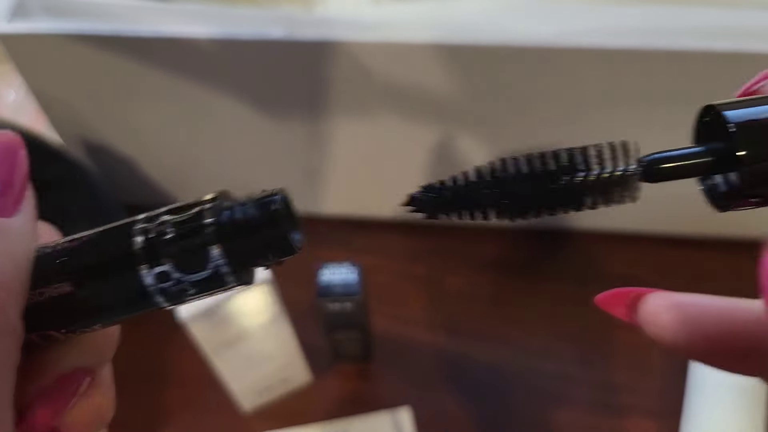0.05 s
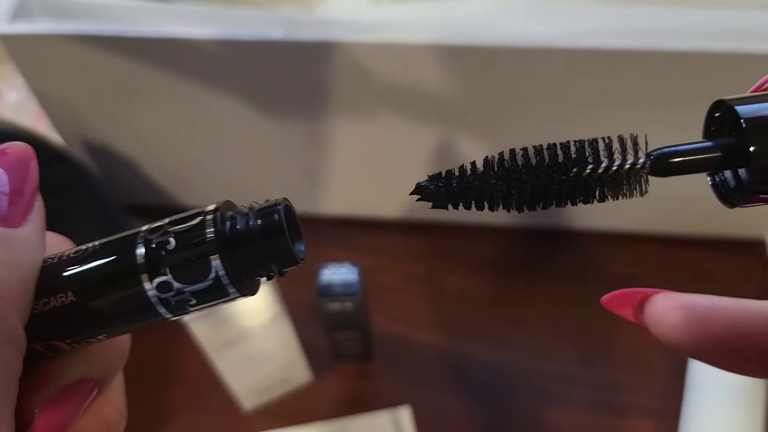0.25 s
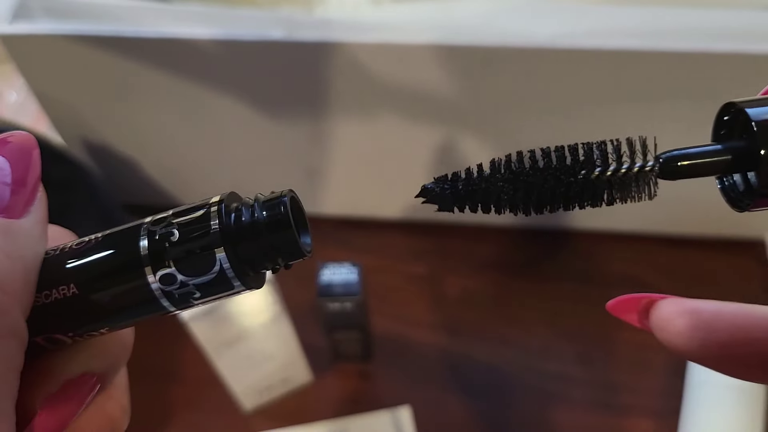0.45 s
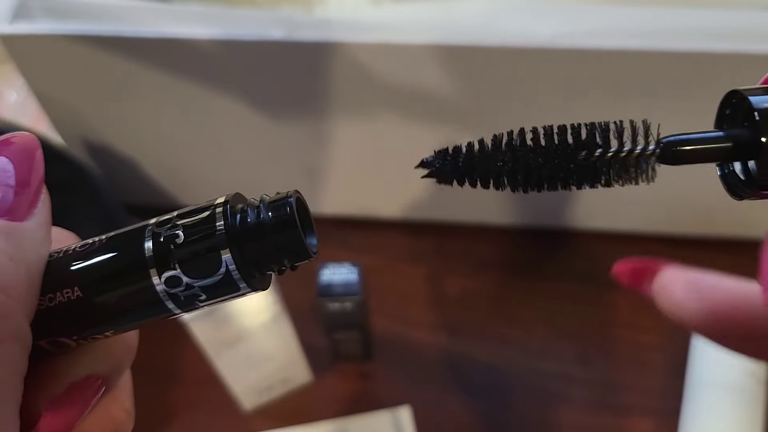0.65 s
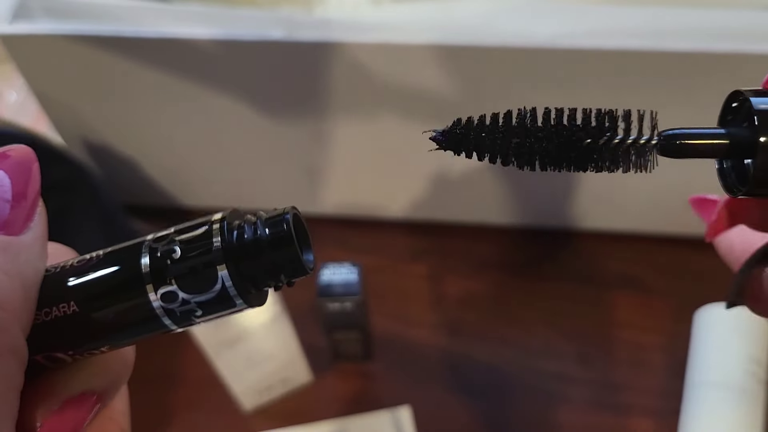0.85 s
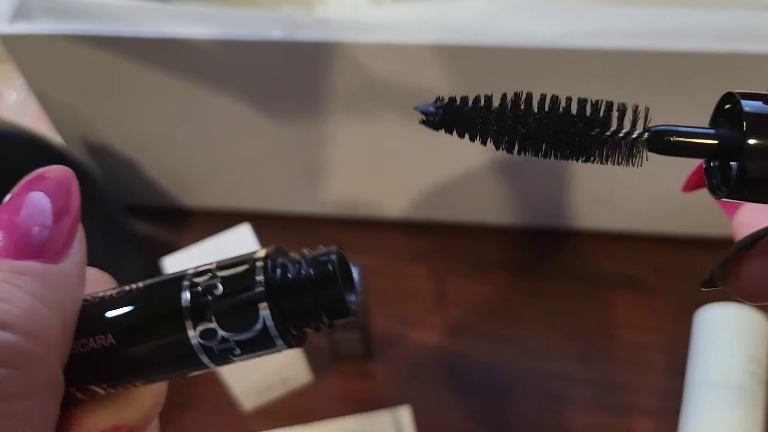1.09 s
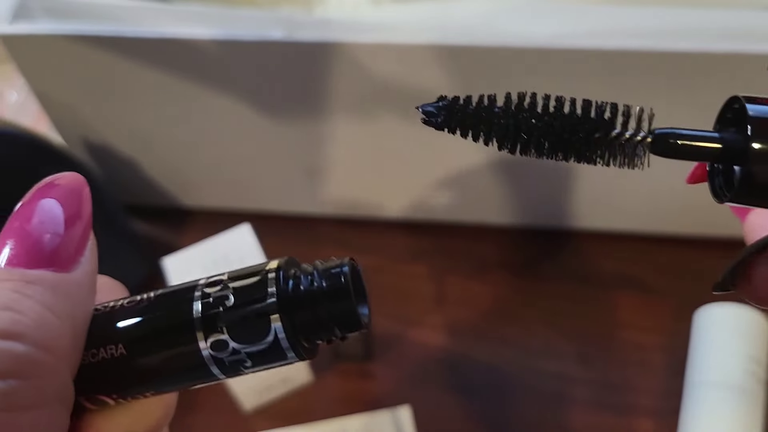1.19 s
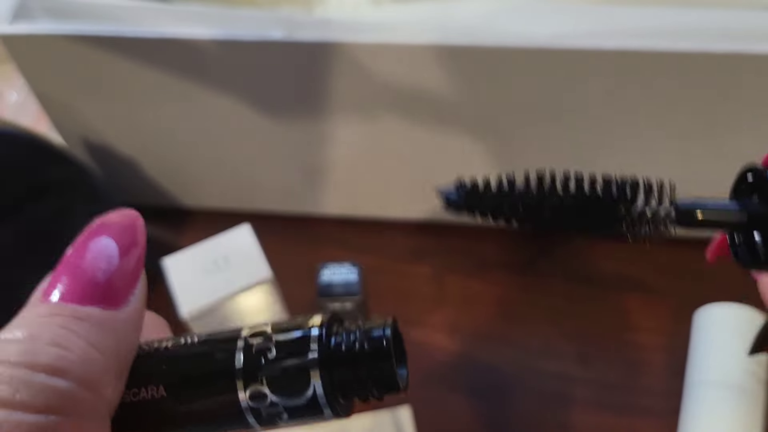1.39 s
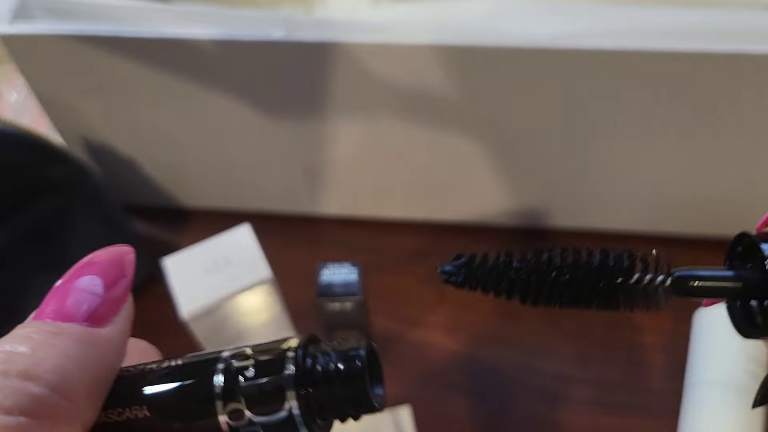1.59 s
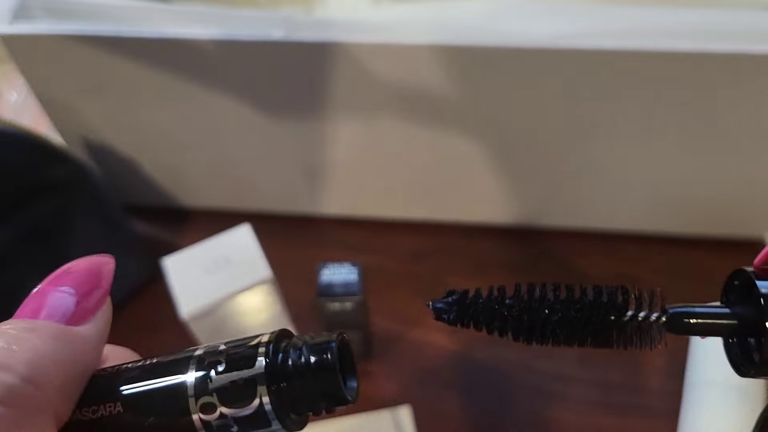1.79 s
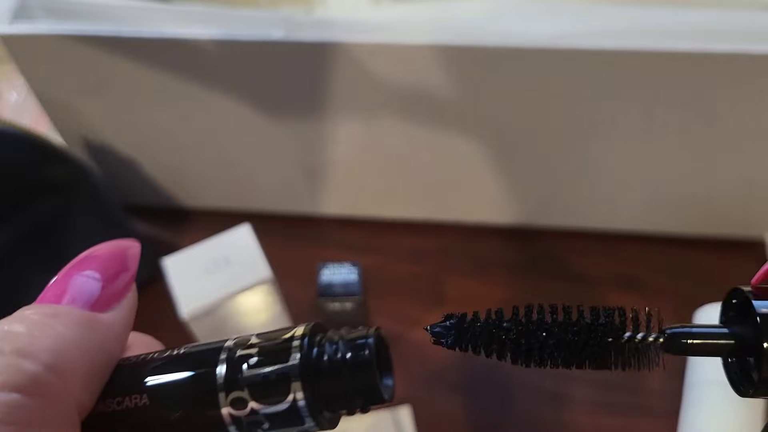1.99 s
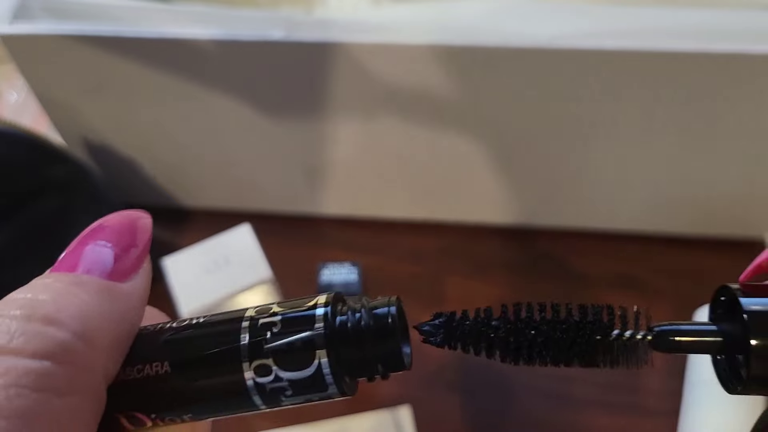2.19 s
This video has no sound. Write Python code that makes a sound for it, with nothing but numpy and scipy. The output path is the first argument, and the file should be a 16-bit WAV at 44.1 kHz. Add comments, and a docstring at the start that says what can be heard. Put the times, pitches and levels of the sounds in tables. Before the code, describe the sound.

A sharp, bright pop as a bristled wand pulls free of a small plastic tube, after a faint rising hiss; then a short room echo, low hum, and much later a tiny nail tap, heard close in stereo.

```python
"""Mains hum, rumble and a fluttering hiss, swelling as a bristled wand is drawn from a small plastic tube.
The wand comes free with a sharp pop, answered by a quiet room; the right microphone ticks faintly, a nail taps.
Hum is wavering sines; rumble, microphone hiss and the air past the wiper are coloured noise.
Pop and tap are decaying modes, the pop with a noise crackle; the room is a noise tail decaying band by band."""
import sys
import numpy as np
from scipy import signal
from scipy.fft import rfft, irfft
from scipy.io import wavfile
from scipy.ndimage import uniform_filter1d

SR = 44100
rng = np.random.default_rng(int(sys.argv[2]) if len(sys.argv) > 2 else 0)


def boost_factor(decibels):
    """Convert a level in decibels to a linear amplitude factor."""
    exponent = np.asarray(decibels, float) / 20
    return 10 ** exponent


def wav_record(signal):
    """Record a signal, one row per channel, as 16-bit PCM in the file named by sys.argv[1]."""
    frames = np.transpose(np.atleast_2d(signal))
    bounded = np.clip(frames, -1, 1)
    # unit amplitude maps onto the largest positive 16-bit level
    quanta = np.round(bounded * 32767).astype(np.int16)
    wavfile.write(sys.argv[1], SR, quanta)


N = 99225
T = np.arange(N) / SR

# Background colour at each microphone. Each row: frequency in Hz, relative level in dB.
LEFT_COLOUR = [(20, -82), (30, -64), (90, -70), (200, -72), (400, -87.5), (650, -87.5), (880, -80),
               (1050, -92), (1600, -94.5), (1900, -104), (2400, -102), (2900, -112), (3600, -108),
               (4500, -110), (5000, -119), (6500, -122), (7000, -117), (7400, -110), (7900, -122),
               (9000, -124), (12000, -119), (15700, -119), (15850, -135)]
RIGHT_COLOUR = [(20, -86), (30, -75), (90, -69), (200, -72), (400, -86), (880, -86.5), (1400, -88.5),
                (2000, -100), (2300, -95), (2800, -106), (3500, -88), (4200, -92.5), (4900, -89.5),
                (5500, -101), (8300, -103), (9500, -120), (11500, -119), (12000, -114), (12500, -118),
                (14000, -117), (15700, -112), (15850, -135)]
# Likeness of the two backgrounds. Each row: frequency in Hz, correlation of left and right.
CORRELATION = [(60, 0.94), (130, 0.88), (290, 0.7), (640, 0.26), (1410, -0.22), (3100, 0.08), (6820, -0.03),
               (15000, -0.0)]
BACKGROUND_DB, RUMBLE_WALK_DB = -12, 2
# Mains hum lines. Each row: frequency in Hz, left and right level in dB rms, width of wander in Hz.
HUM_LINES = [(59.6, -59.5, -59, 3), (120, -62, -64.5, 3), (176, -70.5, -66, 8), (313, -86, -77, 8),
             (353, -78, -76.5, 8), (472.4, -80, -85, 2), (2597, -92, -102, 2), (11980, -104, -103, 40)]

# Colour of air past the wiper. Each row: frequency in Hz, relative level in dB.
AIR_COLOUR = [(880, -44), (1500, -24), (1900, -22), (2270, -4), (2490, -12), (3180, -10), (4000, -14),
              (5070, -5.5), (7030, 1.5), (8320, -12.5), (9470, -20.5), (12900, -14), (16000, -16.5)]
# Balance of the air. Each row: frequency in Hz, left minus right in dB.
AIR_BALANCE = [(1500, -33), (2400, 4), (4400, -9), (6500, -10), (9000, -1), (15000, -11.5)]
# Course of the air. Each row: time in seconds, level in dB.
AIR_LEVEL = [(0, -65), (.03, -62.5), (.13, -60), (.16, -59.5), (.2, -57.5), (.225, -53.5), (.234, -52),
             (.2372, -35), (.24, -95)]
# Brightening of the air. Each row: time in seconds, gain of the treble over the rest in dB.
AIR_TREBLE_GAIN = [(0, -1.5), (.1, -0.5), (.17, 2), (.2, 5.5), (.235, 1.5)]
TREBLE_HZ, FLUTTER_DB = 9037, 1.5

# Modes of tube and wand. Each row: frequency in Hz, relative left and right level in dB, t60 in seconds.
TUBE_MODES = [(690, -26.5, -32.5, .02), (920, -26, -17, .019), (1242, -23, -18.5, .012),
              (1600, -28, -16, .012), (2360, -42, -18, .015), (3400, -13, -11, .015), (4400, -13, -7, .015),
              (5250, -8, -6, 0.01413), (2968, -24.5, -23.5, 0.01506), (5762, -15.5, -10.5, 0.01),
              (6600, -12, -9, .012), (6950, -13.5, -11, 0.013), (7300, -6.5, -8, .016),
              (10100, -22.5, -19.5, .01), (11510, -21.5, -18, .011), (11800, -24, -17.5, .011),
              (14000, -33.5, -14, .012), (15600, -29, -16, .012)]
# First snap of the seal. One row: frequency in Hz, relative left and right level in dB, t60 in seconds.
SNAP_MODE = (5600, -6, 5, .0035)
# Thump of air in the tube. Each row: frequency in Hz, relative left and right level in dB, t60 in seconds.
THUMP_MODES = [(160.2, -15, -12.5, .035), (196.5, -29.5, -28, .14), (253.2, -22, -17.5, 0.038),
               (330, -18.5, -15.5, 0.028)]
# Crackle of the seal letting go. Each row: frequency in Hz, relative level in dB.
CRACK_COLOUR = [(300, -39.5), (1500, -11.5), (3000, -19), (4300, -4.5), (5500, -2), (7500, 0.5),
                (9000, -22), (12000, -16), (16000, -17)]
POP_S, POP_DB, LEFT_LAG_S, PUSH_S = .2374, -7.5, .00017, .00015
THUMP_LAG_S, THUMP_PUSH_S, MIC_LOW_HZ = .0012, .0011, 73
CRACK_DB, CRACK_T60_S, CRACK_PAN_DB = -13, .014, -3

# Room decay. Each row: frequency in Hz, t60 in seconds.
ROOM_DECAY = [(150, 0.06), (1000, 0.63), (2200, 0.17), (3500, 0.26), (5500, 0.3), (7500, 0.3),
              (11000, 0.34), (15000, 0.15)]
# Colour of the pop in the room. Each row: frequency in Hz, relative level in dB.
ROOM_COLOUR = [(80, -9), (200, 7), (400, -5.5), (700, -9.5), (1200, -15), (2000, -10.5), (3000, -2.5),
               (4500, -0.5), (6000, -3), (7400, 0), (8500, -16), (9600, -19), (11000, -14), (13000, -14),
               (15500, -15)]
ROOM_DB, SOFT_ROOM_DB, ROOM_RISE_S = -9.5, -14.5, .008
ECHO_S, ECHO_DB, ECHO_SPREAD_S = .0115, 8.5, .001794

# Bursts of hiss. Each row: start in seconds, relative level in dB.
TICK_TIMES = [(0.366, -62), (0.399, -62), (.4295, -66), (.461, -63), (0.495, -62), (0.528, -67),
              (.5587, -69), (.9673, -69.5), (1.3953, -66), (1.43, -65)]
# Colour of the bursts. Each row: frequency in Hz, relative level in dB.
TICK_COLOUR = [(2600, -31.5), (3300, 1), (5000, -1), (5600, -14), (7000, -40)]
TICK_S = .0099

# Modes of nail on plastic. Each row: frequency in Hz, relative level in dB, t60 in seconds.
NAIL_MODES = [(1935, -4, 0.02), (2265, 0.5, 0.019), (2530, -14, 0.012)]
TAP_S, TAP_DB, TAP_PAN_DB, TAP_PUSH_S = 1.5184, -49.5, -3, .0007

TOP_HZ, POP_TOP_HZ = 15750, 16600


def along(table, hz):
    """Read (Hz, value) rows on a log-frequency axis."""
    table = np.array(table, float)
    return np.interp(np.log(hz + 1), np.log(table[:, 0]), table[:, 1])


def over_time(table):
    """Read (s, value) rows at every sample."""
    return np.interp(T, *np.array(table).T)


def shaped(x, gain):
    """Filter by a gain given as a function of frequency."""
    return irfft(rfft(x) * gain(np.arange(N // 2 + 1) * SR / N), N)


def hiss(colour):
    """Noise of a colour, rms 1."""
    x = shaped(rng.standard_normal(N), lambda hz: boost_factor(along(colour, hz)))
    return x / x.std()


def walk(rate_hz):
    """Smoothed random wander, spread near 1."""
    hold = int(SR / rate_hz)
    steps = np.repeat(rng.standard_normal(N)[:N // hold + 1], hold)
    smooth = uniform_filter1d(uniform_filter1d(steps, hold), hold)
    return 1.3 * smooth[:N]


def ring(start_s, push_s, hz, db, t60_s):
    """One struck mode: a sine that decays exponentially after a push of finite rise."""
    age = np.maximum(T - start_s, 0)
    rise = 1 - np.exp(-age / push_s)
    return boost_factor(db - 60 * age / t60_s) * np.sin(2 * np.pi * hz * age) * rise


def pan(db):
    """Gains of left and right for a level difference."""
    return boost_factor(np.array([[db], [-db]]) / 2)


def below(x, top_hz):
    """Cut steeply above a frequency."""
    def gain(hz):
        return 1 / (1 + np.exp(np.clip((hz - top_hz) / 40, -50, 50)))
    return np.array([shaped(v, gain) for v in x])


def background():
    """Wandering rumble and microphone hiss; shared noise makes the bass alike left and right."""
    one, other = rng.standard_normal((2, N)) * np.sqrt(SR / 2)

    def like(hz):
        return np.clip(along(CORRELATION, hz), -1, 1)

    left = shaped(one, lambda hz: boost_factor(along(LEFT_COLOUR, hz)))
    shared = shaped(one, lambda hz: like(hz) * boost_factor(along(RIGHT_COLOUR, hz)))
    own = shaped(other, lambda hz: np.sqrt(1 - like(hz) ** 2) * boost_factor(along(RIGHT_COLOUR, hz)))
    noise = np.array([left, shared + own])
    rumble = np.array([shaped(v, lambda hz: 1 / (1 + (hz / 400) ** 2)) for v in noise])
    wander = boost_factor(RUMBLE_WALK_DB * walk(4.6))
    return boost_factor(BACKGROUND_DB) * (noise + rumble * (wander - 1))


def hum():
    """Mains lines, each wavering in frequency and level alike on both sides."""
    out = np.zeros((2, N))
    for hz, left_db, right_db, width_hz in HUM_LINES:
        phase = 2 * np.pi * np.cumsum(hz + width_hz * walk(20) / 2) / SR
        tone = np.sin(phase) * boost_factor(2.5 * walk(4))
        out += np.sqrt(2) * boost_factor(np.array([[left_db], [right_db]])) * tone
    return out


def air():
    """Suction hiss past the wiper that grows, brightens and flutters until the wand is out."""
    level = boost_factor(over_time(AIR_LEVEL) + FLUTTER_DB * walk(150))
    both = np.array([shaped(hiss(AIR_COLOUR), lambda hz: boost_factor(side * along(AIR_BALANCE, hz) / 2))
                     for side in (1, -1)])
    treble = np.array([shaped(v, lambda hz: hz > TREBLE_HZ) for v in both])
    return level * (both + treble * (boost_factor(over_time(AIR_TREBLE_GAIN)) - 1))


def pop():
    """Modes struck at once, a later, softer thump and a short crackle; the right microphone is nearer."""
    starts = (POP_S + LEFT_LAG_S, POP_S)
    modes = np.zeros((2, N))
    for side, start in enumerate(starts):
        for mode in TUBE_MODES + [SNAP_MODE]:
            modes[side] += ring(start, PUSH_S, mode[0], mode[1 + side], mode[3])
        for mode in THUMP_MODES:
            modes[side] += ring(start + THUMP_LAG_S, THUMP_PUSH_S, mode[0], mode[1 + side], mode[3])
    modes = signal.sosfilt(signal.butter(2, MIC_LOW_HZ, "high", fs=SR, output="sos"), modes)
    crack = np.array([hiss(CRACK_COLOUR) * (T > s) * boost_factor(-60 * np.abs(T - s) / CRACK_T60_S)
                      for s in starts])
    return boost_factor(POP_DB) * (modes + boost_factor(CRACK_DB) * pan(CRACK_PAN_DB) * crack)


def room_tail():
    """Diffuse noise decaying band by band, with a cluster of echoes from the nearest wall."""
    tail = np.zeros(N)
    for centre_hz in 62 * 2. ** np.arange(0, 8.5, .5):
        band = shaped(rng.standard_normal(N),
                      lambda hz: np.exp(-(np.log2((hz + 1) / centre_hz) / .35) ** 2))
        tail += band * boost_factor(-60 * T / along(ROOM_DECAY, centre_hz))
    tail *= (1 - np.exp(-(T / ROOM_RISE_S) ** 2)) / np.sqrt(SR / 100)
    return tail * (1 + boost_factor(ECHO_DB) * np.exp(-((T - ECHO_S) / ECHO_SPREAD_S) ** 2))


def room(soft):
    """The room's answer: a tail per side, set off by the pop as one click and by the softer sounds."""
    impulse = 1. * (np.arange(N) == int(POP_S * SR))
    click = shaped(impulse, lambda hz: boost_factor(ROOM_DB + along(ROOM_COLOUR, hz)))
    source = rfft(click + boost_factor(SOFT_ROOM_DB) * soft.mean(axis=0), 2 * N)
    return np.array([irfft(source * rfft(room_tail(), 2 * N), 2 * N)[:N] for _ in range(2)])


def ticks():
    """Short grainy bursts of hiss, the left at a tenth of the right."""
    shape = sum(boost_factor(db) * np.exp(-((T - start - TICK_S / 2) / (TICK_S / 2)) ** 2)
                for start, db in TICK_TIMES)
    return np.array([[.1], [1]]) * hiss(TICK_COLOUR) * shape * boost_factor(2 * walk(400))


def nail_tap():
    """A nail on plastic: a few short modes struck together."""
    modes = sum(ring(TAP_S, TAP_PUSH_S, *mode) for mode in NAIL_MODES)
    return boost_factor(TAP_DB) * pan(TAP_PAN_DB) * modes


def scene():
    """Air, pop and tap with the room's answer; ticks, background and hum with them."""
    soft = air() + nail_tap()
    wand_and_nail = below(pop(), POP_TOP_HZ) + below(soft + room(soft), TOP_HZ)
    return wand_and_nail + ticks() + background() + hum()


def roll_off(x):
    """The treble ends steeply here."""
    return signal.sosfilt(signal.butter(12, 16680, fs=SR, output="sos"), x)


def record(dry):
    """The finished mix as the phone stores it."""
    return roll_off(dry)


dry = scene()
out = record(dry)
wav_record(out)
```